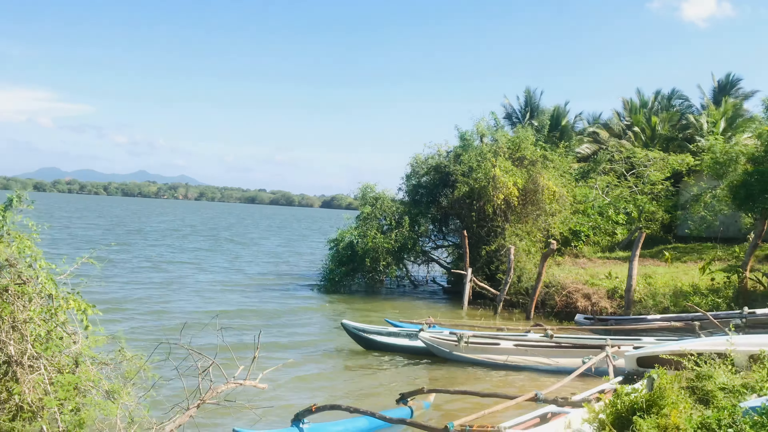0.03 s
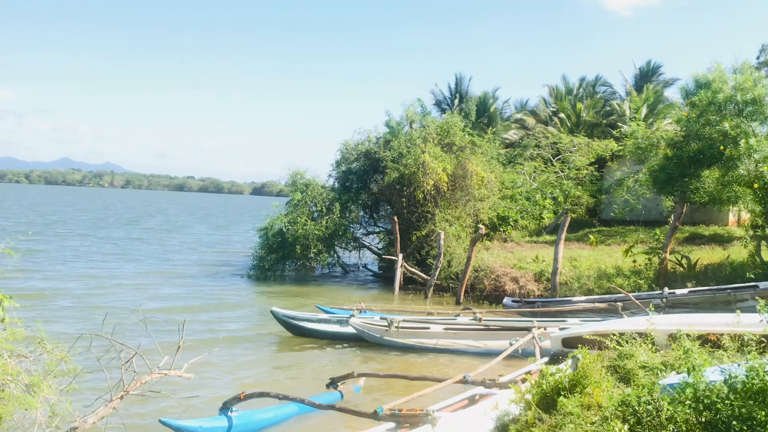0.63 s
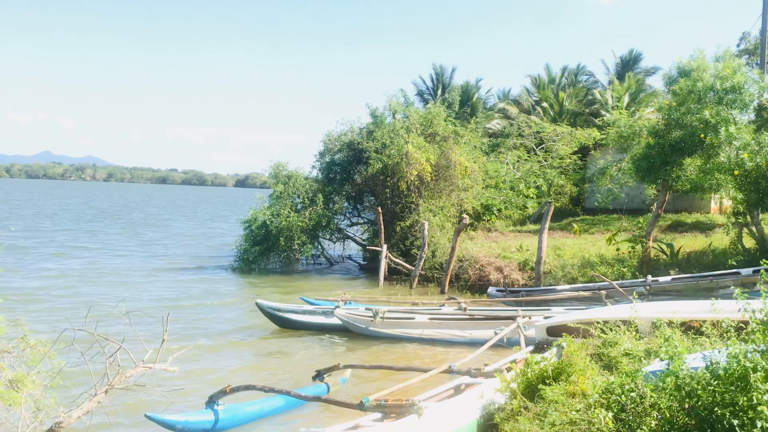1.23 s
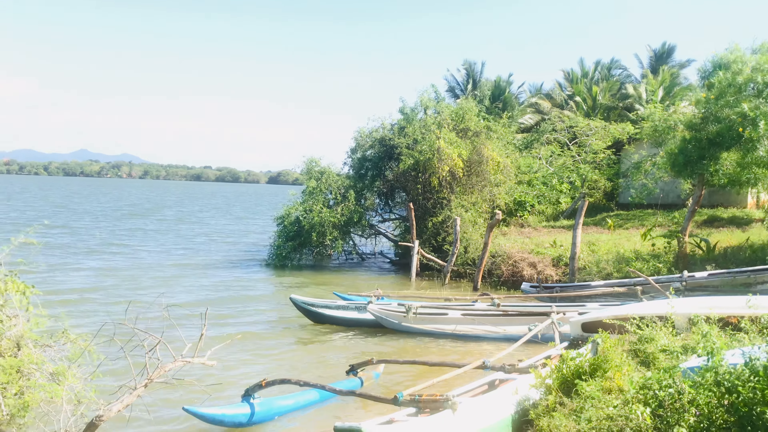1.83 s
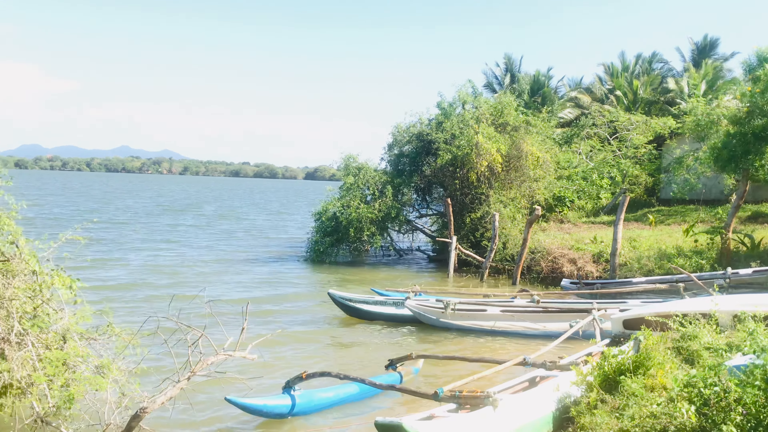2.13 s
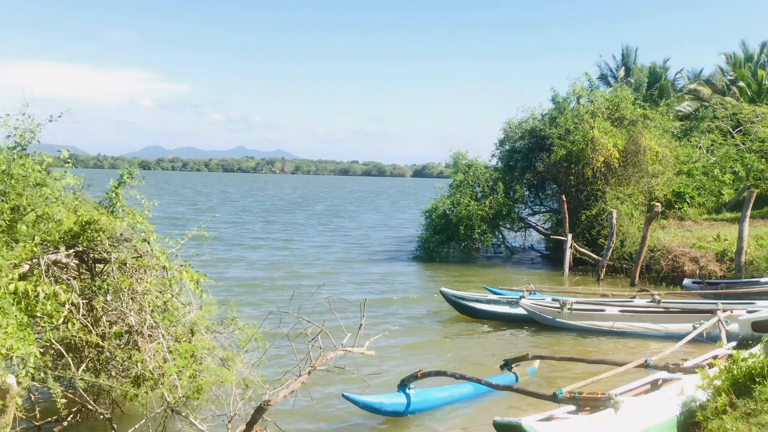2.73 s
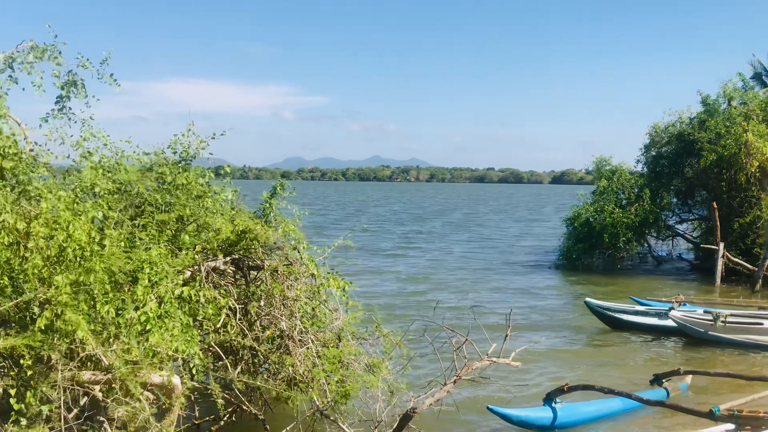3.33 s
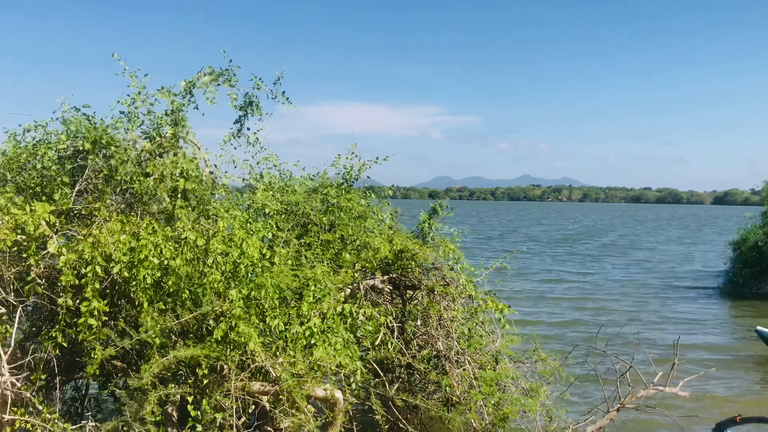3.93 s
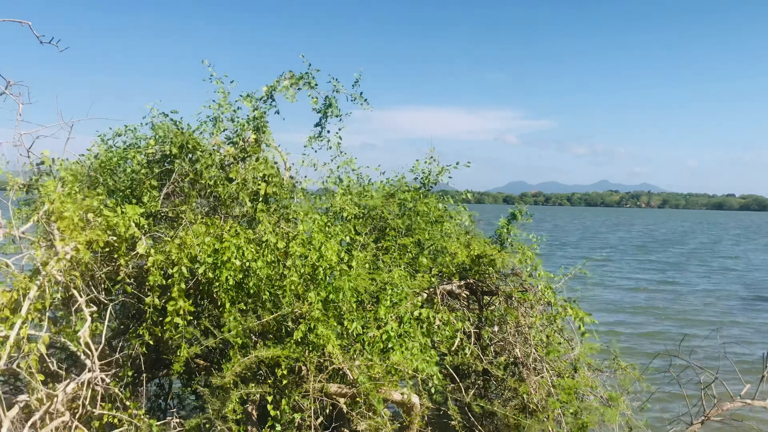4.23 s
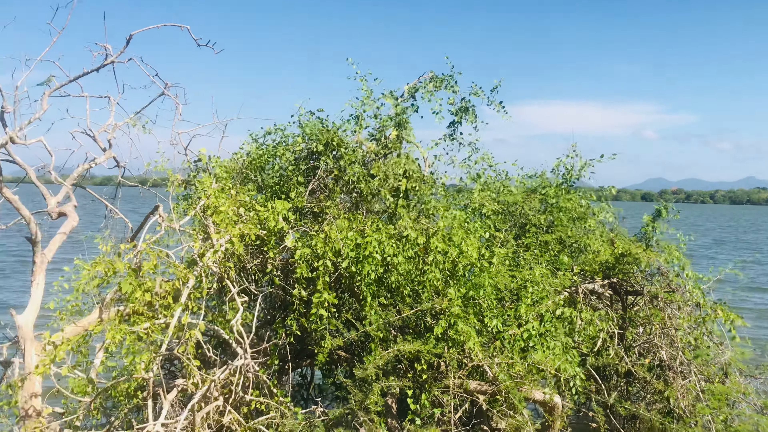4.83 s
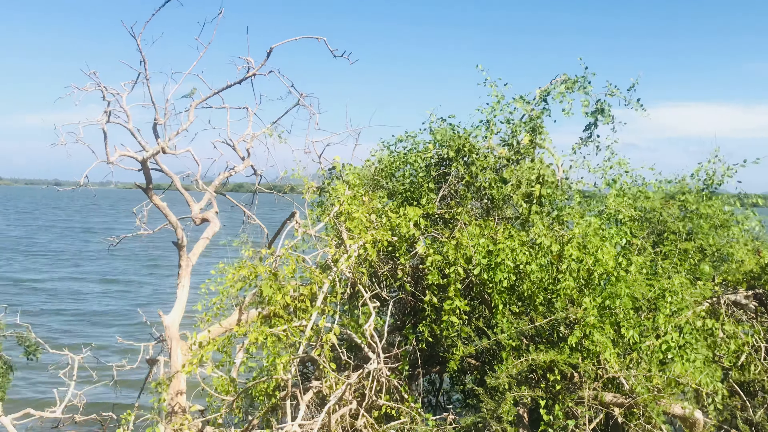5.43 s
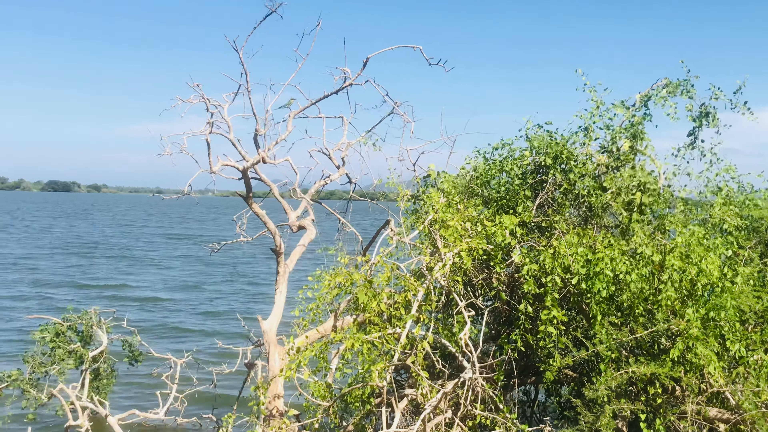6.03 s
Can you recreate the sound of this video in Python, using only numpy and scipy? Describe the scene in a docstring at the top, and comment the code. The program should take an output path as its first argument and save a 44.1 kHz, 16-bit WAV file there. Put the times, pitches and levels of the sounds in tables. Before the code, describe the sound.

Low wind buffets the microphone at a lake shore, growing stronger, while small waves and a high cricket trill sound faintly behind.

```python
"""A breezy lake shore. From the start, gusts rumble and thump on the microphone, small waves wash in
with ringing bubbles, and a bush cricket trills by scraping its wings, all over a faint hiss of leaves.
Around the middle the cricket takes a few brief rests. In the second half the gusts grow stronger and
a few twigs tick. Last, a far, rough whine, only hinted at before, swells and sinks: perhaps a motor."""
import sys
import numpy as np
from scipy import signal
from scipy.io import wavfile
from scipy.ndimage import uniform_filter1d

SR = 44100
rng = np.random.default_rng(int(sys.argv[2]) if len(sys.argv) > 2 else 0)


def generate_wav(sig):
    """Save sig (samples, or channels by samples) to the path in sys.argv[1] as 16-bit PCM at SR."""
    pcm = np.round(np.clip(np.atleast_2d(sig).T, -1, 1) * 32767).astype(np.int16)
    wavfile.write(sys.argv[1], SR, pcm)


N = 268569
TIME = np.arange(N) / SR

# Table levels are set ahead of each layer's level_db trim.
# the breeze between gusts: (time [s], rumble level [dB], flutter level [dB])
BREEZE = [(0, -56.5, -71), (1.2, -61.5, -73), (2.0, -57, -74.5), (2.5, -63.5, -81), (3.4, -60.5, -79),
          (4.3, -52.5, -65), (6.09, -59, -69)]
# gusts at the microphone: (start [s], length [s], rumble level [dB], flutter relative to rumble [dB])
GUSTS = [(0.054, 0.18, -52, -27), (0.287, 0.091, -49, -5.5), (0.431, 0.2, -53, -13),
         (0.674, 0.15, -54.5, -29), (0.987, 0.12, -58, -15), (1.278, 0.23, -53.5, -12),
         (1.816, 0.19, -54.5, -11), (2.712, 0.05, -50, -27), (2.883, 0.33, -58, -9),
         (3.157, 0.08, -50, -15.5), (3.503, 0.078, -50.5, -17), (3.763, 0.13, -45, -11),
         (3.898, 0.14, -43.5, -3), (4.04, 0.38, -51, -8.5), (4.462, 0.19, -46, -6),
         (4.66, 0.059, -47.5, -5), (4.799, 0.16, -42.5, -9), (4.971, 0.36, -42.5, -5),
         (5.342, 0.086, -44.5, -14), (5.452, 0.42, -42.5, -10.5), (5.906, .2, -53, -13.5)]
# single eddies; large ones thump low, small ones slap higher: (time [s], level [dB], pitch [Hz])
EDDIES = [(0.06, -52, 267), (0.299, -35, 81.5), (0.304, -44, 225), (0.319, -40, 50.7), (0.377, -37, 93),
          (1.439, -36, 55), (1.763, -39.5, 144), (1.766, -42, 62), (2.136, -47, 242), (2.138, -46, 74),
          (2.736, -44.5, 49.4), (2.991, -51, 160), (2.999, -40, 79), (3.05, -48.5, 295), (3.186, -38, 66),
          (3.528, -35.5, 77), (3.833, -34.5, 98), (3.903, -46, 210), (3.941, -38.5, 235), (3.951, -36, 230),
          (3.964, -36, 56), (3.993, -35.5, 203), (4.01, -33, 141), (4.322, -35.5, 114), (4.35, -39, 174),
          (4.55, -28, 127), (4.691, -32.5, 61), (4.998, -33, 101), (5.079, -35, 330), (5.103, -25, 75.5),
          (5.108, -28.5, 307), (5.12, -28, 198), (5.22, -40.5, 325), (5.249, -38, 290),
          (5.274, -28.5, 90.5), (5.309, -36.5, 218), (5.489, -29, 58.4), (5.495, -30.5, 170),
          (5.578, -23, 63), (5.673, -31.5, 97), (5.679, -35, 320), (5.706, -35, 233), (5.711, -31.5, 59),
          (5.747, -40, 225), (5.753, -32, 57), (5.807, -37.5, 157), (5.868, -33, 54)]
# tone colour of the large eddies: (frequency [Hz], relative density [dB])
RUMBLE_SPECTRUM = [(20, -31), (32, -16.5), (48, 2.5), (68, 1.5), (105, -7), (160, -23), (260, -40.5),
                   (500, -61)]
# tone colour of the small eddies: (frequency [Hz], relative density [dB])
FLUTTER_SPECTRUM = [(80, -0.5), (125, 6.5), (175, -1), (250, -5.5), (360, -24), (520, -24), (900, -34.5),
                    (1600, -35), (3000, -50)]
# small waves, about one a second: (crest time [s], level [dB], swell time [s])
WAVES = [(0.39, -77, 0.093), (1.56, -72.5, 0.054), (2.38, -75.5, 0.17), (3.35, -74.5, .09),
         (4.12, -69, .12), (5.08, -64.5, 0.047), (5.72, -70.5, 0.71)]
# tone colour of the wash: (frequency [Hz], relative density [dB])
WASH_SPECTRUM = [(150, -2.5), (330, 3), (480, -1), (700, 1.5), (1000, -0.5), (1500, -6), (2200, -13.5),
                 (4000, -21.5), (8000, -33)]
# the clearest bubbles in the waves: (time [s], level [dB], pitch [Hz])
BUBBLES = [(0.404, -62, 510), (0.415, -56.5, 670), (0.455, -63.5, 820), (1.58, -60.5, 960),
           (2.372, -59.5, 630), (2.424, -61, 330), (3.274, -65, 590), (3.383, -59.5, 740),
           (4.047, -58, 1290), (4.111, -54, 600), (4.127, -59, 1197), (4.134, -58, 910), (5.002, -56, 860),
           (5.069, -52, 886)]
# the cricket's trill: (time [s], level [dB], pitch [Hz], rise per half stroke cycle [Hz])
TRILL = [(0, -76, 6850, 400), (1.2, -74.5, 6840, 420), (2.7, -76.5, 6860, 380), (3.5, -74, 6840, 320),
         (3.9, -75.5, 6825, 119), (6.09, -82, 6760, 80)]
# the cricket's rests: (start [s], end [s])
RESTS = [(2.41, 2.435), (2.808, 2.835), (3.632, 3.675), (3.77, 3.797)]
# the far whine: (time [s], pitch [Hz], level [dB], overtone boost [dB])
WHINE = [(3.3, 794, -99, 6), (3.95, 756.5, -83, 4), (4.5, 750, -82, 0.5), (4.8, 753, -77, 2.5),
         (5.1, 749, -81, 5), (5.35, 750.5, -71.5, 4.5), (5.7, 741.4, -65.5, -5), (6.0, 731.6, -67.5, -1.5),
         (6.09, 745, -66.5, 2)]
# its first three partials, ahead of the boost: (level [dB])
WHINE_PARTIALS_DB = [-1, 0.5, -9]
# its brief, higher swells: (centre time [s], level [dB])
WHINE_SWELLS = [(0.15, -79.5), (1.36, -81), (3.64, -78)]
# twig snaps: (time [s], peak level [dB], brightness [Hz])
TWIG_SNAPS = [(3.897, -66, 14500), (4.196, -62, 5170), (4.69, -56.5, 3360), (4.690, -56.5, 8000),
              (5.42, -64, 11950), (5.70, -64, 12020), (5.956, -60, 6040)]
# tone colour of the leaves: (frequency [Hz], relative density [dB])
LEAF_SPECTRUM = [(100, 17.5), (500, 3.5), (1500, 0), (3000, -2), (4500, -3.5), (6200, -5), (7500, -13),
                 (9000, -9), (12000, -11), (16000, -17.5)]
# hollows in the microphone port's response: (frequency [Hz], width [Hz], depth [0-1])
PORT_NOTCHES = [(4890, 330, 0.4), (10440, 310, 0.9)]


def wind(ceiling_db=-26, puff_db=3.5, puff_hz=20):
    """Turbulence hits the microphone in puffs and single buffets; the biggest swings are soft-clipped."""
    large, small = airflow()
    puffs = rms_one(from_db(puff_db * np.clip(drift(puff_hz), -2, 1.3)))
    pressure = puffs * (large * rumble() + small * flutter()) + buffets()
    ceiling = from_db(ceiling_db)
    return ceiling * np.tanh(pressure / ceiling)


def airflow(attack_s=0.028, release_s=0.041):
    """Envelopes of the large and small eddies: each gust rises, holds and dies away over the breeze."""
    large_power, small_power = from_db(in_time(BREEZE)) ** 2
    for start, length, rumble_db, flutter_db in GUSTS:
        attack = np.clip((TIME - start) / attack_s + .5, 0, 1)
        release = np.clip((start + length - TIME) / release_s + .5, 0, 1)
        gust = from_db(rumble_db) * attack * release
        large_power += gust ** 2
        small_power += (gust * from_db(flutter_db)) ** 2
    return np.sqrt(large_power), np.sqrt(small_power)


def rumble():
    """Large eddies press on the microphone port: the low body of the wind."""
    _, bands = noise_bands(RUMBLE_SPECTRUM)
    return even(bands.sum(0), seconds=0.04)


def flutter(level_db=-0.5, lumpy_db=2.0, eddy_hz=35):
    """Small eddies come in lumps, the smallest most of all."""
    centres, bands = noise_bands(FLUTTER_SPECTRUM)
    smallness = np.clip(np.log2(centres / 70) / 2, 0, 1)[:, None]
    lumps = (bands * from_db(smallness * lumpy_db * drift(eddy_hz))).sum(0)
    return from_db(level_db) * even(lumps, seconds=0.12)


def buffets(level_db=-2.0, swell_cycles=0.61, edge=0.023):
    """Each passing eddy gives a thump: a short, lopsided swing of pressure."""
    out = np.zeros(N)
    for (s, db, hz), (turn, wobble) in zip(EDDIES, rng.random((len(EDDIES), 2))):
        start = int(s * SR)
        cycles = TIME[:min(SR // 8, N - start)] * hz
        age = cycles / swell_cycles
        envelope = age ** 2 * np.exp(2 * (1 - age))
        phase = 2 * np.pi * (turn + cycles) + np.sin(np.pi * cycles + 2 * np.pi * wobble) / 2
        swing = np.sin(phase) + edge * np.sin(2 * phase)
        out[start:start + len(age)] += from_db(db + level_db) * envelope * swing
    return out


def waves(level_db=4.5, ripple_db=-75.5, splash_db=1.84, splash_hz=12, drain_ratio=1.2):
    """Each small wave swells and drains over a bed of ripples; each band splashes a little on its own."""
    power = from_db(ripple_db) ** 2
    for crest, wash_db, swell_s in WAVES:
        from_crest = np.maximum(crest - TIME, (TIME - crest) / drain_ratio) / swell_s
        power = power + from_db(wash_db) ** 2 * np.exp(-from_crest)
    _, bands = noise_bands(WASH_SPECTRUM)
    wash = sum(noise * from_db(splash_db * drift(splash_hz)) for noise in bands)
    return from_db(level_db) * np.sqrt(power) * wash


def bubbles(level_db=-1, swell_cycles=2.2, rise_per_cycle=0.011):
    """A trapped bubble rings for a few cycles, bending up in pitch as it nears the surface."""
    out = np.zeros(N)
    for s, db, hz in BUBBLES:
        start = int(s * SR)
        cycles = TIME[:min(SR // 12, N - start)] * hz
        age = cycles / swell_cycles
        envelope = age * np.exp(1 - age)
        ring = np.sin(2 * np.pi * cycles * (1 + rise_per_cycle * cycles / 2))
        out[start:start + len(age)] += from_db(db + level_db) * envelope * ring
    return out


def cricket(level_db=-1.04, strokes_per_s=80.5, stroke_width=0.12, hitch_chance=0.054, waver_hz=40):
    """Every wing stroke draws a file over a scraper: a short, rising tone. At times the wings hitch."""
    beats = np.arange(int(N / SR * strokes_per_s) + 2)
    hitches = rng.random(len(beats)) < hitch_chance
    lag = .45 * np.cumsum(hitches)  # each hitch drags the rhythm by nearly half a stroke
    starts = (beats + lag + rng.normal(0, .02, len(beats))) / strokes_per_s
    place = np.interp(TIME, starts, beats) % 1 - .5  # zero at mid-stroke
    stroke = np.exp(-.5 * (place / stroke_width) ** 2)
    resting = sum((TIME > start) & (TIME < end) for start, end in RESTS)
    gate = uniform_filter1d(1. - resting, size=600)
    trill_db, pitch, rise = in_time(TRILL)
    hz = pitch + 2 * rise * place + waver_hz * drift(155)
    tone = np.sin(2 * np.pi * np.cumsum(hz) / SR)
    foliage_scatter = from_db(-14) * rms_one(band(rng.standard_normal(N), 6650, 7000))
    gain = from_db(trill_db + level_db + 0.05 * drift(25))
    return gain * gate * (rms_one(stroke * tone) + foliage_scatter)


def whine(level_db=-2.5, swell_hz=802, swell_s=0.056):
    """A far whine drifts in briefly a few times, then stays, sinking in pitch and growing duller."""
    pitch, whine_db, overtones_db = in_time(WHINE)
    held = from_db(whine_db) * far_tone(pitch, overtones_db)
    swells = sum(from_db(db) * np.exp(-.5 * ((TIME - s) / swell_s) ** 2) for s, db in WHINE_SWELLS)
    return from_db(level_db) * (held + swells * far_tone(swell_hz, overtones_db=4))


def far_tone(pitch, overtones_db, jitter=0.012, jitter_hz=50, scatter=0.5, scatter_hz=22):
    """An unsteady tone arrives by many shifting paths, so each partial flutters on its own."""
    phase = 2 * np.pi * np.cumsum(pitch * (1 + jitter * drift(jitter_hz))) / SR
    tone = np.zeros(N)
    for k, db in enumerate(WHINE_PARTIALS_DB, 1):
        paths = 1 + scatter * (drift(scatter_hz * k) + 1j * drift(scatter_hz * k))
        partial = even(np.real(paths * np.exp(1j * k * phase)), seconds=0.14)
        tone += from_db(db + overtones_db * (k > 1)) * partial
    return tone


def twigs(t60_s=0.039):
    """Twigs give tiny dry snaps, each a fast-dying burst of band-passed noise."""
    out = np.zeros(N)
    age = TIME[:SR // 10]
    for s, peak_db, hz in TWIG_SNAPS:
        burst = rng.standard_normal(len(age)) * from_db(-60 * age / t60_s)
        snap = band(burst, hz * 0.51, hz * 1.12)
        start = int(s * SR)
        out[start:start + len(age)] += (from_db(peak_db) * snap / abs(snap).max())[:N - start]
    return out


def leaves(level_db=-68.5):
    """Far leaves blend into a smooth bed of hiss."""
    _, bands = noise_bands(LEAF_SPECTRUM)
    return from_db(level_db) * bands.sum(0)


def noise_bands(spectrum):
    """Centres and signals of half-octave noise bands, shaped to a spectrum and summing to rms 1."""
    freqs, levels = np.transpose(spectrum)
    edges = 20 * 2 ** np.arange(0, 10.1, .5)
    edges = edges[(edges > freqs[0] / 2) & (edges < freqs[-1] * 2)]
    centres = np.sqrt(edges[1:] * edges[:-1])
    bands = np.array([band(rng.standard_normal(N + SR // 2), low, high)[-N:]
                      for low, high in zip(edges, edges[1:])])
    bands *= from_db(np.interp(np.log(centres), np.log(freqs), levels))[:, None]
    return centres, bands / bands.sum(0).std()


def drift(rate_hz):
    """Smooth random modulation at rms 1, drawn every 40 samples."""
    pole = np.exp(-2 * np.pi * rate_hz * 40 / SR)
    noise = rng.standard_normal(N // 40 + 2002)
    slow = signal.lfilter([1], [1, -2 * pole, pole * pole], noise)[2000:]
    return np.interp(np.arange(N) / 40, np.arange(len(slow)), rms_one(slow))


def band(x, low, high):
    """Butterworth band-pass, edges in Hz."""
    return signal.sosfilt(signal.butter(2, [low, min(high, SR / 2.1)], "band", fs=SR, output="sos"), x)


def even(x, seconds):
    """Ride the gain to hold the running rms near 1."""
    return x / np.sqrt(uniform_filter1d(x ** 2, int(seconds * SR) + 1) + 1e-12)


def in_time(rows):
    """One automation curve for each column after the time."""
    times, *columns = np.transpose(rows)
    return [np.interp(TIME, times, column) for column in columns]


def rms_one(x):
    """Scale to rms 1."""
    return x / np.sqrt(np.mean(x ** 2) + 1e-20)


def from_db(db):
    """Decibels to gain."""
    return 10 ** (np.asarray(db) / 20)


def scene():
    """All layers mixed in mono at one microphone."""
    return (wind() + waves() + bubbles() + leaves() + cricket() + whine() + twigs())[None]


def record(dry, low_cut_hz=32, high_cut_hz=15700):
    """The microphone port hollows two treble bands; the deepest bass and the top are cut."""
    for hz, width_hz, depth in PORT_NOTCHES:
        dry = dry - depth * signal.lfilter(*signal.iirpeak(hz, hz / width_hz, fs=SR), dry)
    dry = signal.sosfilt(signal.butter(4, low_cut_hz, "high", fs=SR, output="sos"), dry)
    return signal.sosfilt(signal.ellip(12, .1, 70, high_cut_hz, fs=SR, output="sos"), dry)


dry = scene()
out = record(dry)
generate_wav(out)
```